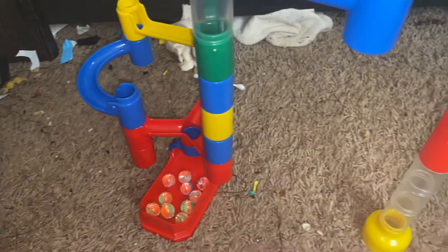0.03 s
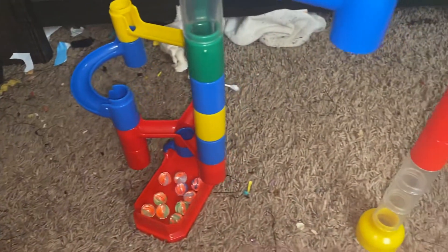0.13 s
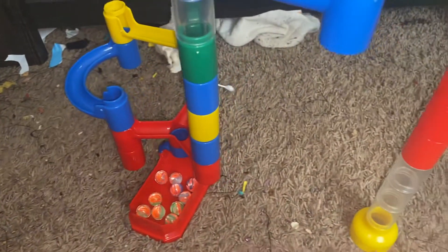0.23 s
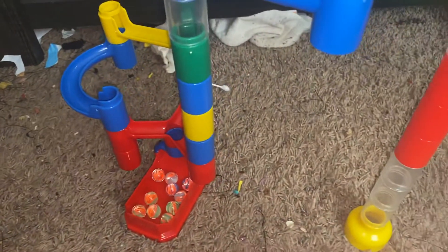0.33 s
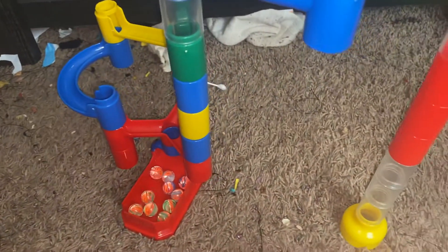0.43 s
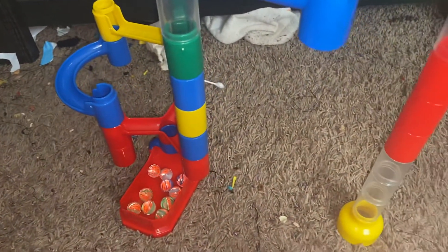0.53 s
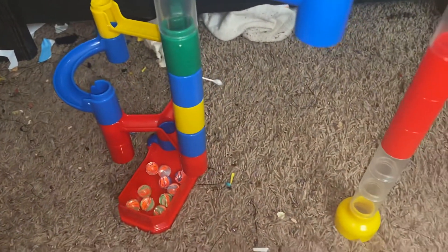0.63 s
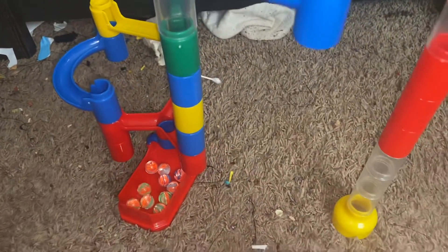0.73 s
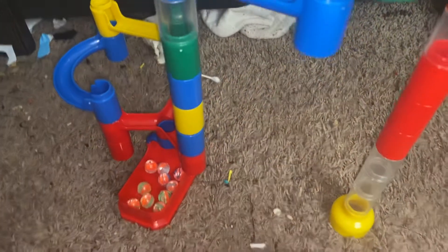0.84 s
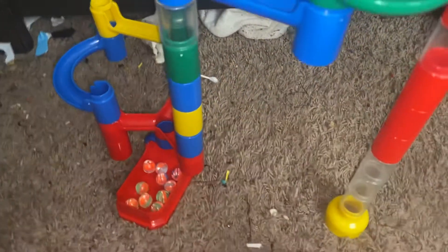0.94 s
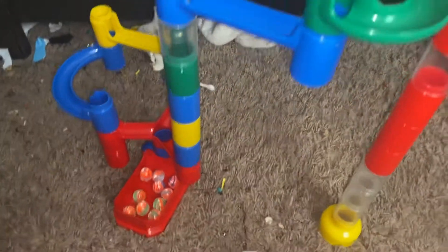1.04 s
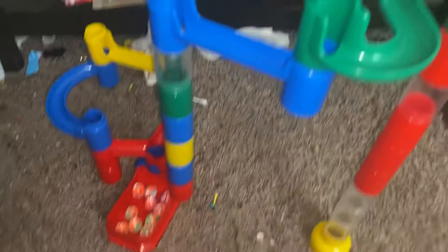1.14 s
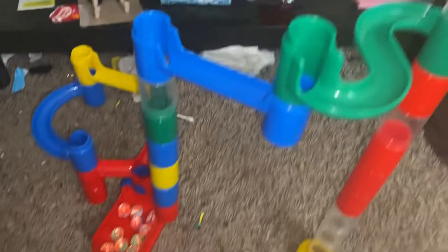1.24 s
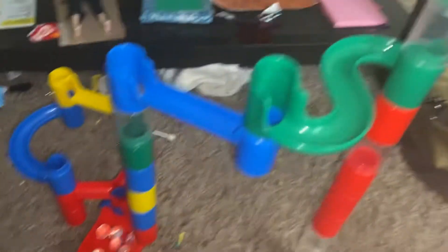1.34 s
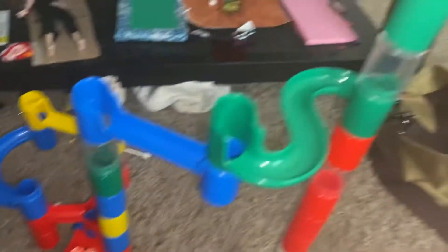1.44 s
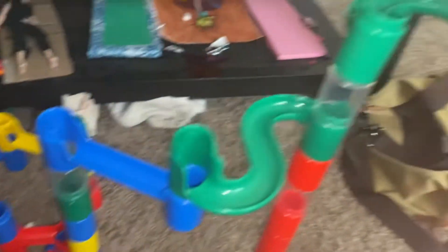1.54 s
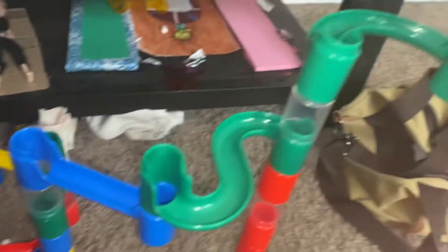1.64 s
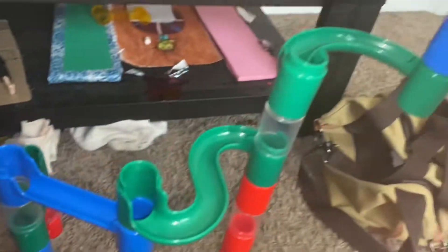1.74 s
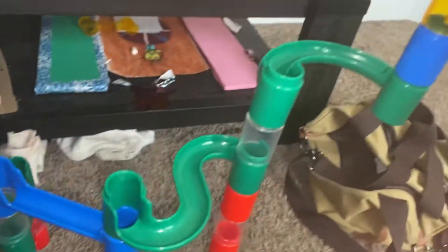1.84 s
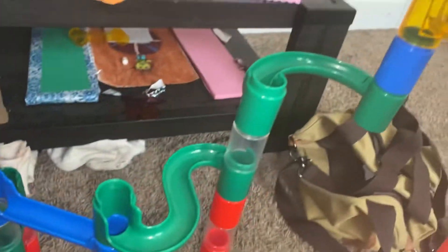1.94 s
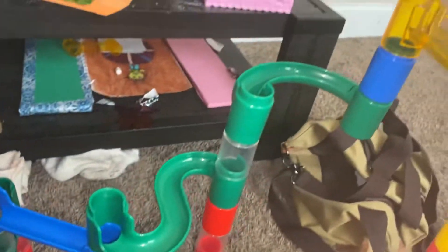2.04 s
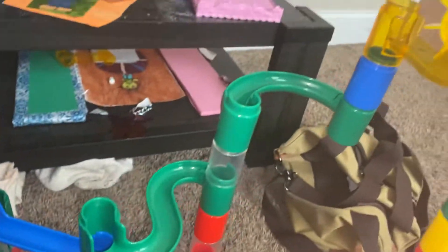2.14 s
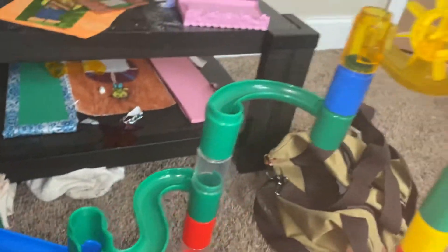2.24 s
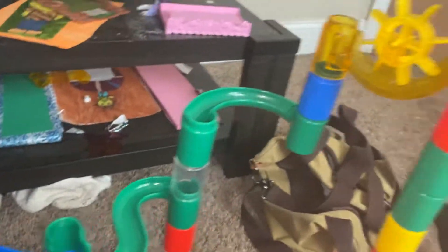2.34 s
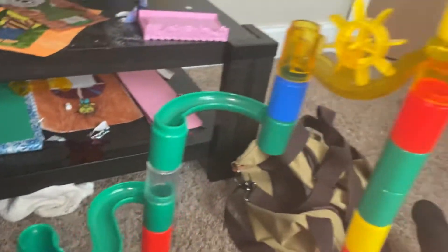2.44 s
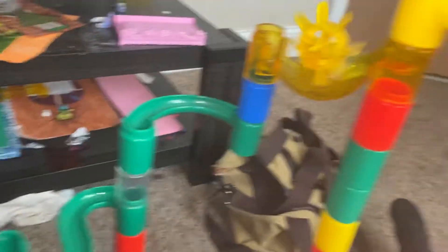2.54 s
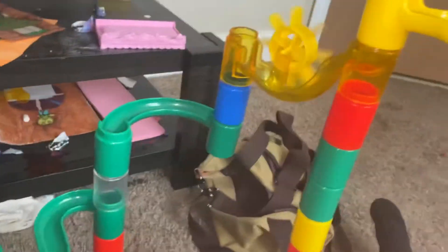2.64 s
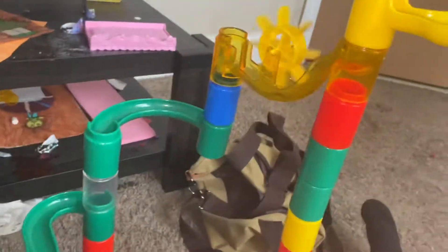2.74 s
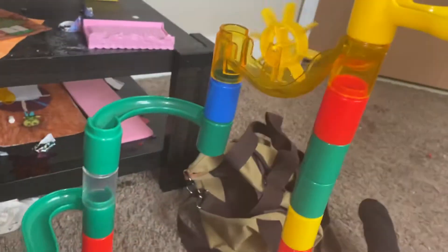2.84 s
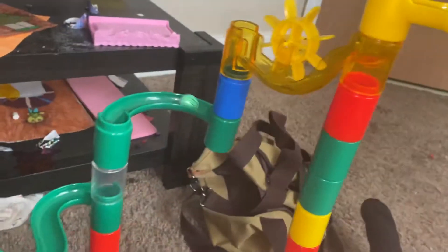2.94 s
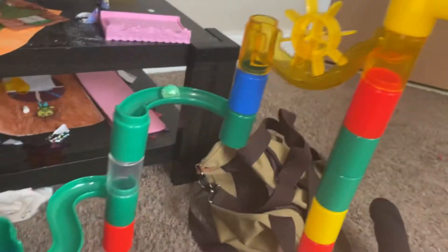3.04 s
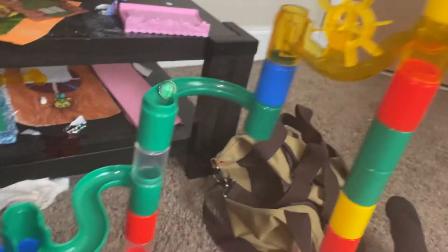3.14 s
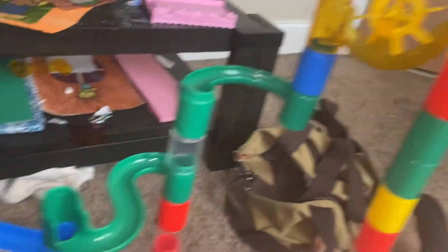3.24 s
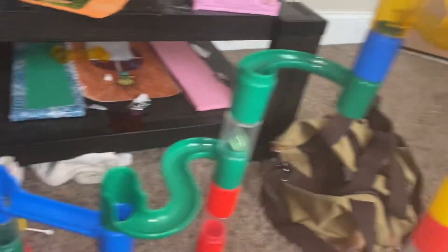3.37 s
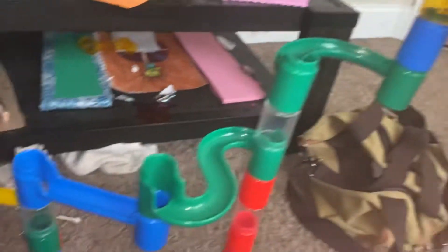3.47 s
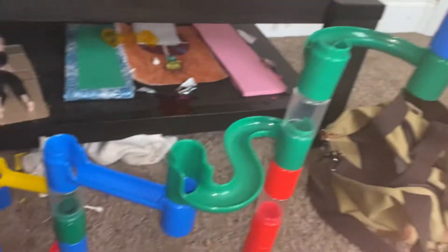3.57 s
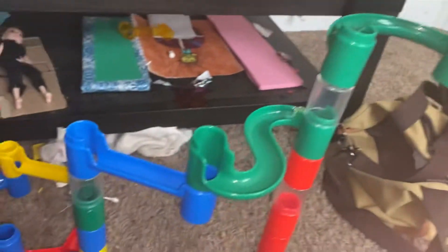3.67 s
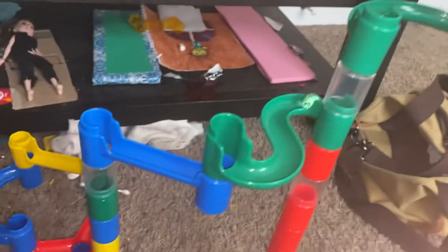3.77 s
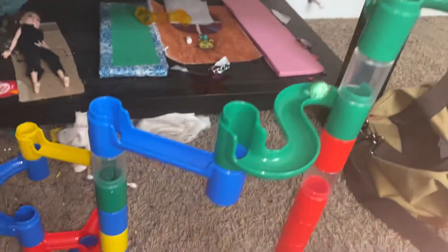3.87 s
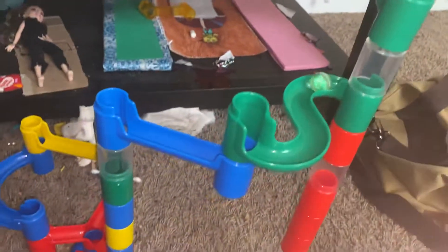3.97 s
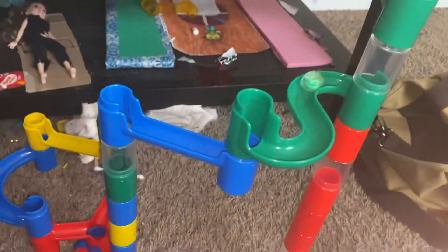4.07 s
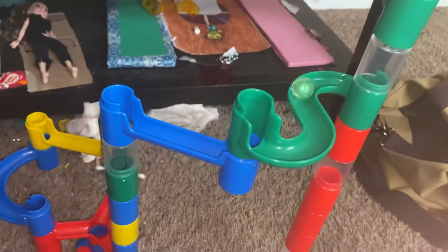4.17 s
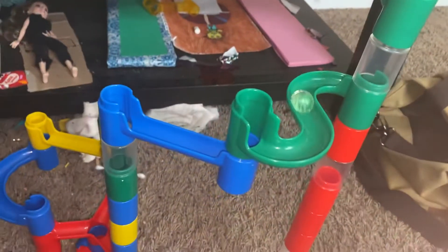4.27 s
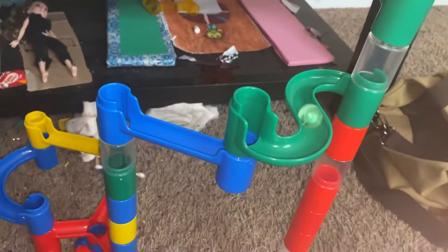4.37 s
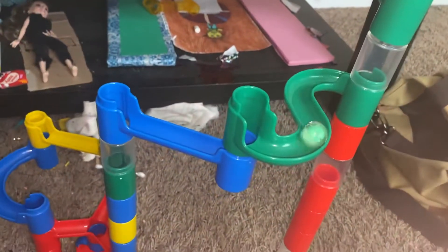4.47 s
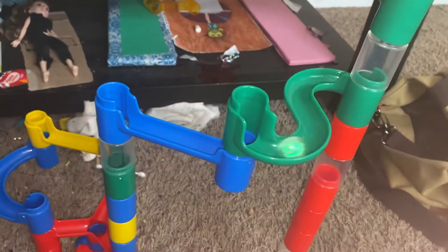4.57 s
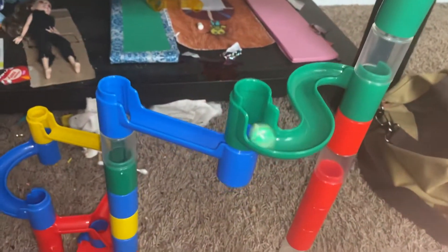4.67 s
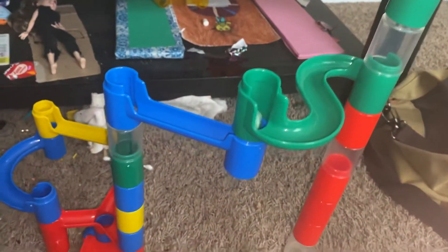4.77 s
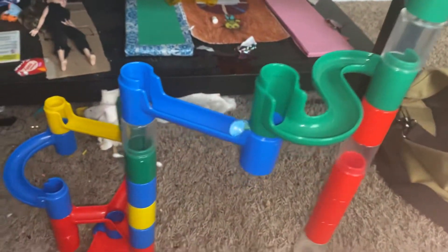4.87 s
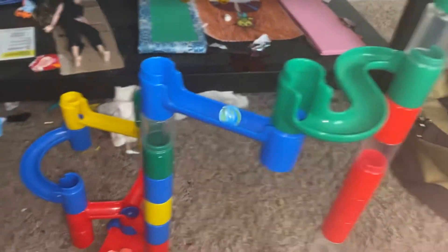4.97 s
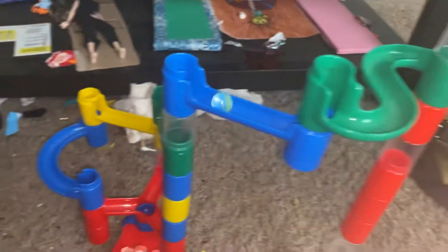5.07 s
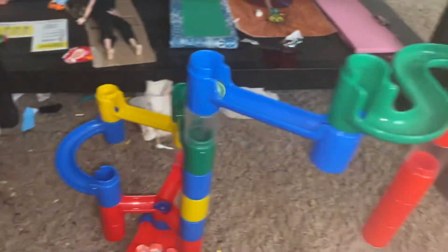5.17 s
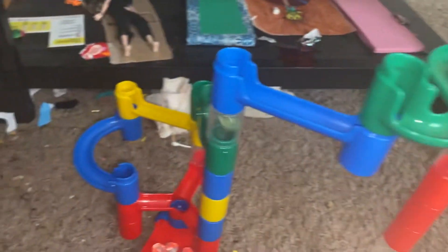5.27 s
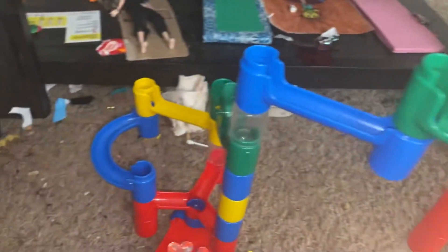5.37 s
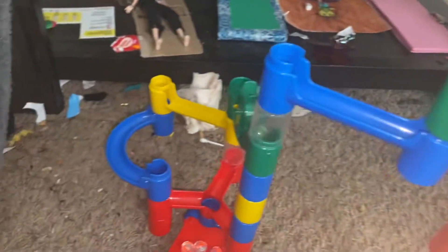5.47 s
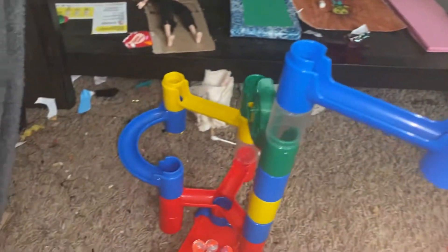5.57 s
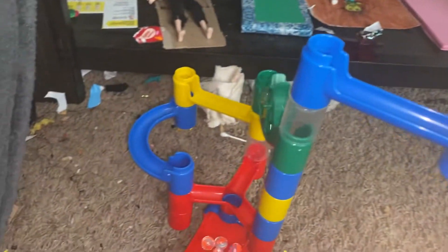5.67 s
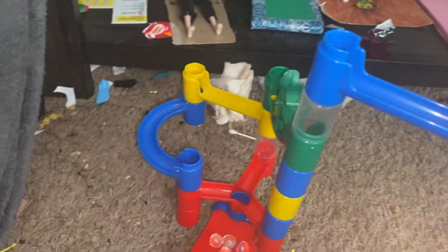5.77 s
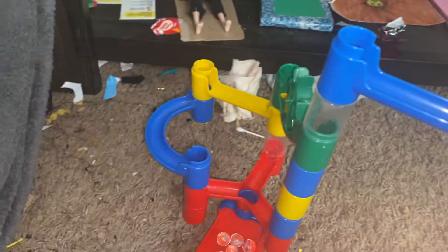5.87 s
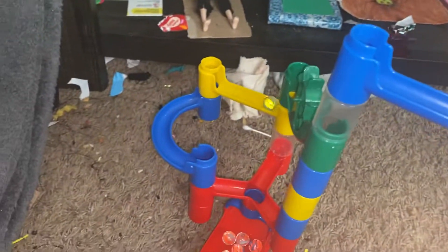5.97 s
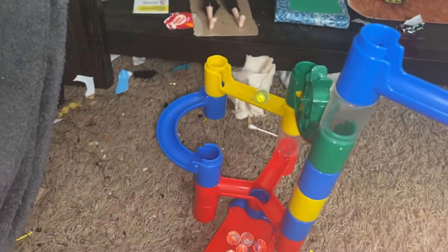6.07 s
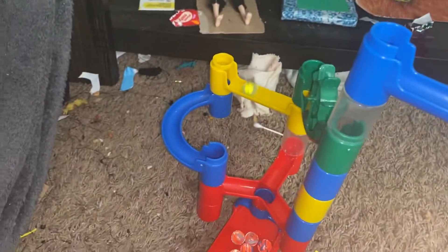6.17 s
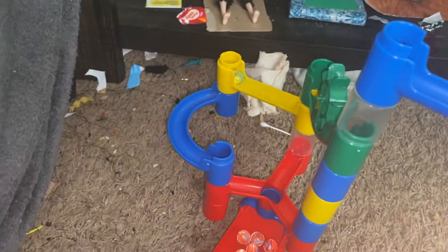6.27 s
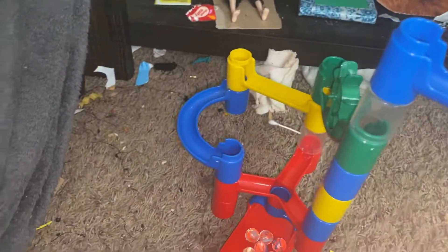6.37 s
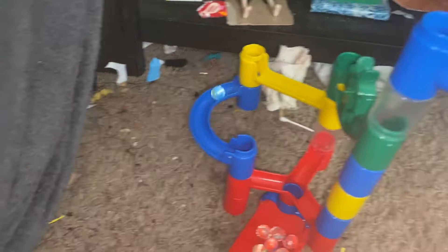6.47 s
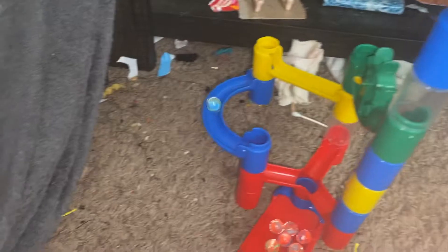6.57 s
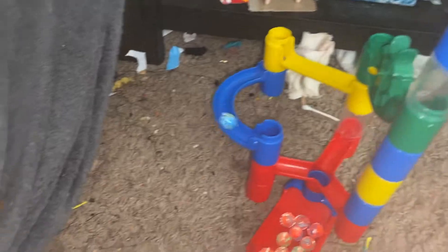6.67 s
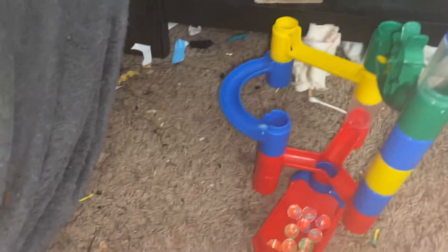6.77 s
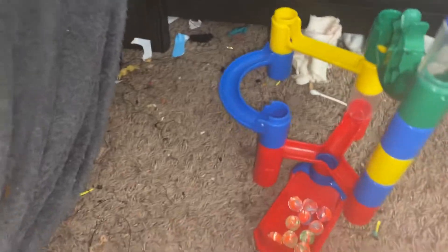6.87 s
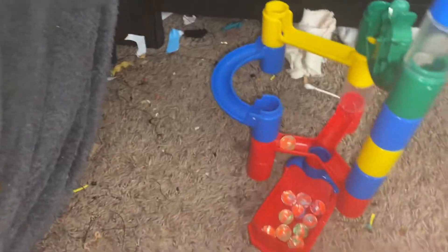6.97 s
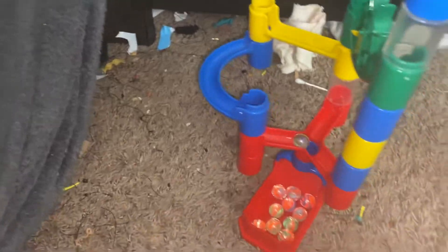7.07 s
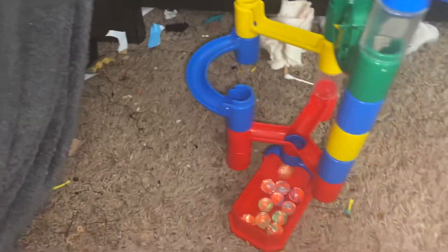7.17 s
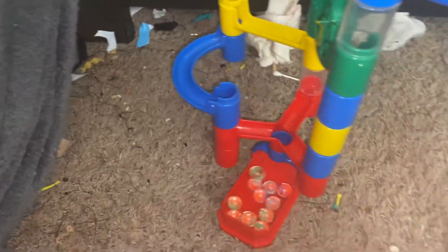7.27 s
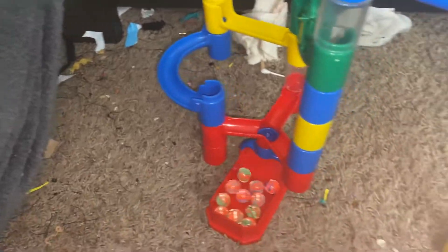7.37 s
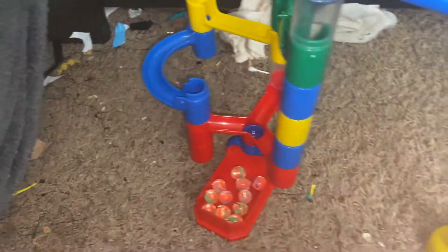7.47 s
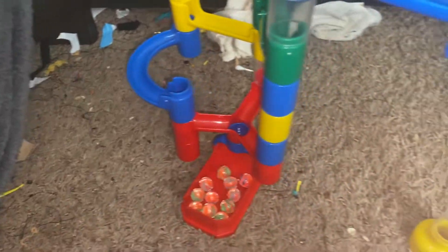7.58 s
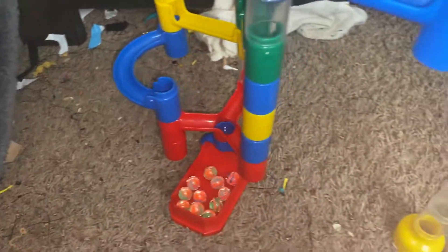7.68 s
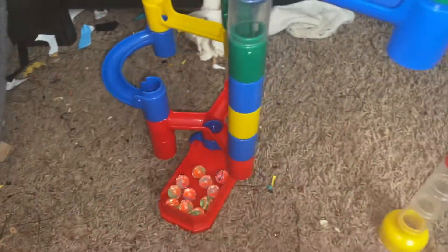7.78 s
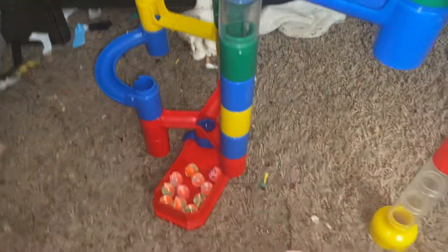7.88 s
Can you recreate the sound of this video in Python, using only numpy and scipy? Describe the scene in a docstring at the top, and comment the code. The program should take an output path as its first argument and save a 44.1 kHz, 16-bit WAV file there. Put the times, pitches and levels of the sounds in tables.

```python
"""Marble run in a carpeted room

A glass marble runs down a plastic toy track: it rolls along chutes, drops through tubes, bounces and rattles
on each piece, and ends in a tray of marbles. Blows and fine bumps ring banks of decaying modes, one bank for
each stretch of track. Filtered clicks add thumps and a hollow drone; a diffuse tail makes the room.
Shaped noise lies underneath as a low rumble and faint hiss."""
import sys
import numpy as np
from scipy import signal
from scipy.fft import rfft, irfft
from scipy.io import wavfile
from scipy.ndimage import uniform_filter1d, minimum_filter1d

SR = 44100
rng = np.random.default_rng(int(sys.argv[2]) if len(sys.argv) > 2 else 0)


def unload_wav(signal):
    """Save mono or channel-first audio to the path in sys.argv[1] as 16-bit WAV at rate SR, clipped to [-1, 1]."""
    wavfile.write(
        sys.argv[1],
        SR,
        np.round(np.clip(np.atleast_2d(signal).T, -1, 1) * 32767).astype(np.int16),
    )


N = 348831
WALL_MODES = 200   # short, dense modes in every piece

# Clear resonances of the pieces of track.
# Each row: pitch in Hz, width in Hz (held within 20 to 500 when rung), level in dB.
FUNNEL = [(2930, 57, 3), (4800, 11, 0), (6200, 40, 2.5), (6520, 280, -10), (8400, 530, -9)]
WHEEL = [(899, 100, 3.5), (2140, 28, -3), (2880, 40, -2), (5025, 100, -14), (5950, 37, -17),
         (6100, 73, -17), (6730, 180, -17)]
ARC = [(1900, 89, -9), (2040, 58, -31), (3346, 150, -4.5), (6700, 230, -11.5)]
CUP = [(1205, 50, 3), (1600, 100, -4), (2700, 110, -6), (3120, 70, -2), (3440, 90, 1), (4520, 170, -8),
       (5730, 70, -11), (6800, 100, -9)]
SNAKE = [(2940, 66, -3.5), (3560, 29, -5), (5700, 160, -7.5), (6700, 690, -5.5)]
RAMP = [(1072, 110, -3.5), (2712, 43, -2.5), (3170, 170, -6.5), (4970, 150, -19.5), (5000, 63, -14),
        (6370, 53, -11.5)]
PADDLES = [(1724, 57, -2), (2010, 140, -7), (2653, 59, 2), (3134, 37, -2.5), (4398, 140, -4.5),
           (4400, 100, -5.5), (6375, 240, -7)]
TRAY = [(656, 44, -6.5), (2057, 100, -1), (2863, 120, -5), (4150, 48, -26), (5960, 150, -38.5),
        (6350, 24, -12), (6780, 84, -5)]
# The route, one stretch per row. Each row: start in seconds, resonances of the piece in use.
ROUTE = [(0, TRAY), (1.7, FUNNEL), (2.02, WHEEL), (2.7, ARC), (3.38, CUP), (4.0, SNAKE), (5.05, RAMP),
         (5.65, PADDLES), (6.78, TRAY)]
# How each stretch responds. Each row: body below 1.5 kHz in dB for a blow of 0 dB or more,
# clear resonances over wall modes in dB when rolled on.
CONTACT = [(-6.5, 4), (-28, 5.5), (-22.5, 3), (-26.5, 4), (-12.5, 8.5), (-18, 6), (-18.5, 6.5), (-15, 8),
           (-16, 4)]


def from_db(db):
    """Decibels to gain."""
    return 10 ** (np.asarray(db) / 20)


def in_time(rows):
    """Curve columns at every sample."""
    s, *columns = np.transpose(rows)
    return [np.interp(np.arange(N) / SR, s, column) for column in columns]


def at_hz(points, hz):
    """A spectrum read on a log-frequency axis."""
    point_hz, point_db = np.transpose(points)
    return np.interp(np.log(hz), np.log(point_hz), point_db)


def band(x, low_hz, high_hz):
    """Band-pass scaled to rms 1."""
    x = signal.sosfilt(signal.butter(2, [low_hz, high_hz], "band", fs=SR, output="sos"), x)
    return x / np.std(x)


def band_db(x, low_hz, high_hz):
    """Energy of a band in dB against the whole sound."""
    power = np.abs(rfft(x)) ** 2
    hz = np.arange(len(power)) * SR / len(x)
    return 10 * np.log10(power[(hz > low_hz) & (hz < high_hz)].sum() / power.sum())


def grains(size, per_s, spread_db):
    """Random clicks of uneven size, rms near 1."""
    clicks = (rng.random(size) < per_s / SR) * rng.standard_normal(size)
    clicks = clicks * from_db(spread_db * np.minimum(rng.exponential(1, size), 4))
    return clicks / np.sqrt(np.mean(clicks ** 2) + 1e-20)


def random_signs(count):
    """Polarity of each mode, up or down at random."""
    return rng.choice([-1, 1], count)


def is_clear(hz):
    """Mark the clear resonances, which stand ahead of the wall modes."""
    return np.arange(len(hz)) < len(hz) - WALL_MODES


def stretch_at(s):
    """Number of the stretch of the route in use at a time in seconds."""
    return np.searchsorted([start for start, piece in ROUTE], s, "right") - 1


def background():
    """Steady low rumble of the house and microphone hiss: noise shaped by one spectrum."""
    # Rumble and hiss spectrum. Each row: frequency in Hz, level in dB per Hz.
    rumble = [(15, -68), (25, -26), (55, -15.5), (70, -3), (95, -10), (120, -11), (214, -19), (259, -21),
              (349, -20.5), (389, -23.5), (553, -29), (746, -33), (7300, -44), (11000, -45), (16500, -61)]
    level_db = -59   # rms
    hz = np.maximum(np.arange(N // 2 + 1) * SR / N, 1)
    noise = irfft(rfft(rng.standard_normal(N)) * from_db(at_hz(rumble, hz)), N)
    return from_db(level_db) * noise / np.std(noise)


def room(x):
    """A diffuse tail whose treble dies sooner on carpet."""
    t60_s, treble_ratio, build_up_s = 0.21, 0.26, 0.029
    t = np.arange(SR // 2) / SR
    noise = rng.standard_normal(len(t))
    low = signal.sosfilt(signal.butter(1, 4000, fs=SR, output="sos"), noise)
    treble = noise - low
    tail = low * from_db(-60 * t / t60_s) + treble * from_db(-60 * t / (treble_ratio * t60_s))
    tail *= np.clip(t / build_up_s, 0, 1)
    return signal.fftconvolve(x, tail / np.sqrt(np.sum(tail ** 2)))[:N]


def modes_of(piece):
    """Pitches and decaying sines of a piece: its clear resonances plus many short wall modes."""
    # Dense wall modes of the plastic. Each row: frequency in Hz, relative level in dB per Hz.
    walls = [(180, -70.5), (300, -40.5), (638, -13.5), (1600, -7), (2740, -6), (8440, -7.5), (13700, -17.5),
             (16500, -28.5)]
    wall_t60_s, wall_db = 0.024, 14   # decay at 3 kHz, lift over the table
    t = np.arange(3072) / SR
    hz, width, level_db = np.transpose(piece)
    width = np.clip(width, 20, 500)

    wall_hz = np.linspace(300 ** .5, 16500 ** .5, WALL_MODES) ** 2 * rng.uniform(.99, 1.01, WALL_MODES)
    wall_width = np.log(1000) / np.pi / wall_t60_s * (wall_hz / 3000) ** 0.83
    # sparser high modes each stand for a wider band; wide modes need more height for the same peak
    wall_gain = from_db(wall_db + at_hz(walls, wall_hz)) * np.sqrt((wall_hz / 3000) ** .5 * wall_width)

    hz, gain = np.r_[hz, wall_hz], np.r_[from_db(level_db) * width, wall_gain]
    width = np.r_[width, wall_width]
    decay = np.exp(-np.pi * width[:, None] * t)
    return hz, gain[:, None] * decay * np.sin(2 * np.pi * hz[:, None] * t)


def rubbing(bodies, bumps, start_s, end_s):
    """Fine bumps ring whichever piece the marble is on, in overlapping steps with fresh mode strengths."""
    step = 1024
    fade = np.hanning(2 * step) ** .5
    rung = np.zeros(N + 8192)
    for a in range(round(start_s * SR), round(end_s * SR), step):
        stretch = stretch_at((a + step) / SR)
        hz, rings = bodies[stretch]
        # steady rubbing builds up the narrow resonances
        clear = from_db(CONTACT[stretch][-1] * is_clear(hz))
        # as the contact point travels, other modes come forward
        strength = clear * from_db(rng.normal(0, 2, len(hz))) * random_signs(len(hz))
        body = strength @ rings
        sound = signal.fftconvolve(fade * bumps[a:a + 2 * step], body / np.sqrt(np.sum(body ** 2)))
        rung[a:a + len(sound)] += sound
    return rung[:N]


def moving_colour(x, centre_hz):
    """Half-octave bands weighted around a centre that moves in time, falling off on both sides."""
    below_db_per_octave, above_db_per_octave = 6, 8.5
    quarter_octave = 2 ** .25
    out = 0
    for k, hz in enumerate(500 * 2 ** np.arange(0, 5, .5)):
        octaves = np.log2(hz / centre_hz)
        slope_db = np.where(octaves > 0, -above_db_per_octave * octaves, below_db_per_octave * octaves)
        # alternating signs keep neighbouring bands from cancelling where they meet
        sign = (-1) ** k
        out = out + sign * from_db(slope_db) * band(x, hz / quarter_octave, hz * quarter_octave)
    return out


def tower_drone(bumps):
    """Hollow drone of the tower: the rolling bumps through one low band."""
    # Drone level. Each row: time in seconds, level in dB.
    drone_curve = [(1.78, -74.5), (2.8, -64), (3.6, -68.5), (3.8, -76), (4.3, -70), (5.15, -65.5),
                   (5.3, -57), (5.6, -62), (5.75, -46.5), (6.25, -54.5), (6.7, -59.5), (7.1, -62),
                   (7.62, -94)]
    centre_hz, width_hz = 278, 79
    level_db, = in_time(drone_curve)
    return from_db(level_db) * band(bumps, centre_hz - width_hz / 2, centre_hz + width_hz / 2)


def rolling(bodies):
    """Fine bumps of the chute excite the track and tower; speed and curve shift the colour."""
    # The marble rolling. Each row: time in seconds, rumble level in dB (before halving), centre of colour in Hz.
    roll = [(1.78, -40.5, 5240), (2.0, -67.5, 3620), (2.3, -61.5, 1900), (2.8, -48.5, 2300),
            (3.1, -49, 1760), (3.3, -48.5, 2160), (3.6, -49.5, 1900), (3.72, -82, 1600), (4.0, -71.5, 2220),
            (4.3, -54, 1150), (4.74, -49.5, 1950), (4.95, -47.5, 2160), (5.08, -52, 1730),
            (5.15, -53.5, 2050), (5.45, -53.5, 2050), (5.6, -37.5, 1940), (5.7, -56.5, 2380),
            (6.05, -45.5, 2000), (6.29, -110, 1970), (6.47, -45, 1870), (6.75, -42.5, 2130),
            (7.09, -59.5, 2000), (7.5, -79, 2016), (7.62, -72, 2000)]
    start_s, end_s = roll[0][0], roll[-1][0]
    rumble_db, centre_hz = in_time(roll)
    knots = np.arange(0, N, 600)
    uneven_db = np.interp(np.arange(N), knots, rng.normal(0, 2.5, len(knots)))
    bumps = from_db(uneven_db) * grains(N, per_s=4000, spread_db=2.5)
    rumble = moving_colour(rubbing(bodies, bumps, start_s, end_s), centre_hz)
    t = np.arange(N) / SR
    moving = (t > start_s) & (t < end_s)
    return moving * (from_db(rumble_db) * rumble * .5 + tower_drone(bumps))


def blows():
    """Single hits, bounces and ridge ticks as rows of the same columns, plus the stretch of the route."""
    # Marble strikes plastic. Each row: time in seconds, peak in dB, sharpness above 6 kHz in dB,
    # pitch of the struck spot in Hz, rattle t60 in seconds.
    hits = [(0.11, -43, -16, 2080, 0.11), (0.419, -36.5, -34, 2050, 0.082), (0.85, -47, -39, 1730, 0.11),
            (1.1, -43, 13, 2380, 0.12), (1.125, -57, 8, 1680, 0.12), (1.209, -52, 6, 2870, 0.11),
            (1.53, -31.5, -3, 2980, 0.09), (1.738, -0.5, 2.5, 2960, 0.12), (1.769, -10, -4.5, 3300, 0.091),
            (1.785, -17.5, -3, 2980, 0.1), (1.903, -37.5, -8, 2760, 0.1), (2.042, -31, -27, 1760, 0.19),
            (2.21, -31, -20.5, 2970, 0.12), (2.228, -23.5, -14, 2900, 0.14),
            (2.256, -25, -29.5, 2960, 0.13), (2.317, -28.5, -48, 2100, 0.1),
            (2.375, -9.5, -13.5, 3000, 0.19), (2.381, -11.5, -11, 2970, 0.15),
            (2.405, 0.5, -14, 5160, 0.14), (2.42, -22, -5, 3040, 0.12), (2.449, -19.5, -9, 2650, 0.23),
            (2.52, -10, 7, 3170, 0.17), (2.529, -13.5, -11, 3095, 0.18), (2.55, -7.5, -6.5, 3020, 0.19),
            (2.571, -15.5, -15.5, 2970, 0.12), (2.621, -15, 6, 3450, 0.15), (2.639, -13, -12, 2900, 0.14),
            (2.728, -3.5, -10.5, 3200, 0.14), (2.759, -5.5, -6, 3000, 0.09), (2.801, -8.5, -12, 4000, 0.17),
            (2.817, -2, -16.5, 1720, 0.14), (2.869, -17, -13, 2740, 0.16), (2.897, -16, -14, 3130, 0.17),
            (3.049, -31.5, -36, 3500, 0.13), (3.217, -38, -23, 2190, 0.11), (3.245, -30.5, -9, 2210, 0.1),
            (3.282, 0, -7, 3850, 0.082), (3.304, -19.5, -7, 4860, 0.1), (3.312, -8.5, -9.5, 3380, 0.098),
            (3.32, -16.5, -11, 3120, 0.12), (3.344, -9.5, -6, 2200, 0.065),
            (3.367, -6.5, -14.5, 3530, 0.054), (3.392, 1.5, -2.5, 3630, 0.11),
            (3.41, -4.5, -3.5, 3440, 0.097), (4.104, -27.5, -8, 3090, 0.096),
            (4.135, -36.5, -5, 2680, 0.12), (4.435, -22.5, -5, 2680, 0.19), (4.447, -26, -25, 3150, 0.15),
            (4.733, -51, 6, 1910, 0.12), (4.765, -6.5, -6, 2200, 0.12), (4.773, -6, -15, 2260, 0.14),
            (4.798, -2, -12.5, 3030, 0.26), (4.826, -9, -23, 2700, 0.11), (4.845, -0.5, -7.5, 3070, 0.098),
            (4.959, -30.5, -27, 3180, 0.15), (5.107, -36.5, -15, 2000, 0.14),
            (5.165, -30.5, -25, 2130, 0.07), (5.206, -5.5, -16.5, 2940, 0.12),
            (5.214, -4.5, -13.5, 2780, 0.1), (5.228, -4.5, -12.5, 2800, 0.091),
            (5.272, -13, -4.5, 2800, 0.1), (5.287, 1.5, -12, 3500, 0.12), (5.295, -1, -11.5, 3340, 0.074),
            (5.3, -1, -18, 4920, 0.12), (5.316, -1, -9, 3320, 0.12), (5.325, 1, -8.5, 3250, 0.076),
            (5.366, -11.5, -16, 3540, 0.11), (5.4, -23.5, -16, 3230, 0.1), (5.482, -8.5, -0.5, 2740, 0.18),
            (5.51, -7, -11, 2550, 0.18), (5.68, 4, -10.5, 2710, 0.13), (5.722, -14, -22, 2610, 0.1),
            (5.739, 0.5, -4, 2690, 0.14), (5.75, -1.5, -9.5, 2470, 0.12), (5.761, -6, -25, 2100, 0.12),
            (5.776, -6, -14.5, 2740, 0.095), (6.314, -2.5, -12.5, 2700, 0.064),
            (6.342, 2, -13.5, 3800, 0.13), (6.382, -3, -10, 3130, 0.07), (6.41, -14.5, -31, 2620, 0.13),
            (6.53, -20.5, -15.5, 2700, 0.075), (6.615, -25, -16, 2660, 0.18),
            (6.679, -30.5, -35, 1720, 0.1), (6.764, -24, -15.5, 2620, 0.055), (6.803, 8, -11, 2540, 0.075),
            (6.826, -12, -19, 2770, 0.13), (6.852, 8, -9.5, 3160, 0.093), (6.874, 4.5, -11.5, 2570, 0.1),
            (6.916, 4, -5.5, 2550, 0.092), (7.045, -31.5, -23, 1680, 0.12), (7.103, -2.5, -11, 2730, 0.13),
            (7.115, -3.5, -8, 2810, 0.076), (7.173, 7, -13, 1950, 0.098), (7.233, -5, -11.5, 2020, 0.085),
            (7.259, -9, -8.5, 2860, 0.11), (7.329, -18, -8, 2990, 0.1), (7.36, 4, -9.5, 2020, 0.1),
            (7.39, -12.5, -19, 2015, 0.093), (7.4, -1, -11.5, 2770, 0.12), (7.419, -12, -21, 2170, 0.13),
            (7.466, -20.5, -17, 1960, 0.12), (7.485, -26, -7.5, 2900, 0.13), (7.677, -26, -18, 2090, 0.076),
            (7.771, -28.5, -36, 2960, 0.063)]
    # The marble bounces to rest, each hop shorter and softer. Each row: first blow in seconds, its peak in dB,
    # sharpness in dB, spot in Hz, rattle t60 in seconds, loss in dB per hop.
    bounces = [(3.469, -10.5, -8, 3450, 0.065, 2.5), (5.82, -8.5, -12, 2620, 0.16, 4)]
    # Timing of those bounces. Each row: first hop in seconds, length ratio of each hop to the last, blow count.
    hops = [(.042, .72, 7), (.0345, .73, 5)]
    rows = list(hits)
    for (s, peak_db, *colour, loss_db), (hop_s, ratio, count) in zip(bounces, hops):
        for k in range(count):
            elapsed_s = hop_s * (1 - ratio ** k) / (1 - ratio)
            rows.append((s + elapsed_s, peak_db - loss_db * k, *colour))

    # the marble speeds up over evenly spaced ridges
    first_s, ridges_per_s, gain_per_s2, ridge_count = 5.967, 16.4, 40.5, 7
    first_db, rise_db, sharp_db, rattle_t60_s = -18.5, 0.77, -14.5, 0.093
    first_spot_hz, spot_hz_per_tick = 2020, 150
    for k in range(ridge_count):
        speed = np.sqrt(ridges_per_s ** 2 + 2 * gain_per_s2 * k)
        s = first_s + (speed - ridges_per_s) / gain_per_s2
        rows.append((s, first_db + rise_db * k, sharp_db, first_spot_hz + spot_hz_per_tick * k, rattle_t60_s))
    return [(*row, stretch_at(row[0])) for row in rows]


def thumps():
    """Blows shake the whole tower on the carpet, heard as low band-passed clicks."""
    lift_db = 6.5
    clicks = np.zeros(N)
    for s, peak_db, *colour, stretch in blows():
        clicks[round(s * SR)] = from_db(peak_db + .5 * CONTACT[stretch][0] + lift_db)
    return signal.sosfilt(signal.butter(2, [70, 330], "band", fs=SR, output="sos"), clicks + 1e-18)


def struck_body(body, peak_db, sharp_db, spot_hz, stretch):
    """Ring of one blow: fresh mode strengths, favoured around the struck spot and tilted in tone."""
    # Clear resonances over wall modes when struck, in dB, one value per stretch.
    clear_lift_db = [0, 7, 6, 2, 12, 0, 5, 3, 2]
    spot_db, spot_octaves = 7, 0.28
    clear_spread_db, wall_spread_db = 3, 2.5   # change of mode strengths from blow to blow
    body_db_per_db = -0.2   # a light touch is longer and feeds the low modes more
    hz, rings = body
    clear = is_clear(hz)
    favoured_db = spot_db * np.exp(-(np.log2(hz / spot_hz) / spot_octaves) ** 2)
    favoured_db = favoured_db + clear_lift_db[stretch] * clear
    spread_db = np.where(clear, clear_spread_db, wall_spread_db) * rng.standard_normal(len(hz))
    strength = from_db(favoured_db + spread_db) * random_signs(len(hz))
    plain = strength @ rings

    # lean the low and high modes towards the body and sharpness of this blow
    body_db = CONTACT[stretch][0] + body_db_per_db * min(peak_db, 0)
    low_lift_db = body_db - band_db(plain, 500, 1500)
    high_lift_db = sharp_db - band_db(plain, 6000, 15000)
    tilt = [(900, low_lift_db), (1800, 0), (4500, 0), (9000, high_lift_db)]
    return (strength * from_db(at_hz(tilt, hz))) @ rings


def glass_crack(sharp_db):
    """Glass meeting plastic: a very short bright noise burst, relative to the peak of the ring."""
    level_db, t60_s = -11.5, 0.00081
    t = np.arange(200) / SR
    return np.diff(rng.standard_normal(201)) * from_db(level_db + sharp_db - 60 * t / t60_s)


def strikes(bodies):
    """Each blow rings the piece with fresh mode strengths, then the marble chatters against the walls."""
    joints_db, joints_t60_s, rattle_db = -18.5, 0.017, -29
    out, size = np.zeros(N + 16384), 8192
    t = np.arange(size) / SR
    for s, peak_db, sharp_db, spot_hz, rattle_t60_s, stretch in blows():
        ring = struck_body(bodies[stretch], peak_db, sharp_db, spot_hz, stretch)
        # loose joints pass the blow on for a few milliseconds, the chatter lasts longer
        shake = from_db(joints_db - 60 * t / joints_t60_s) + from_db(rattle_db - 60 * t / rattle_t60_s)
        push = shake * grains(size, per_s=2500, spread_db=1.5)
        push[0] = 1   # the blow itself
        sound = signal.fftconvolve(push, ring)
        sound[:200] += glass_crack(sharp_db) * np.abs(sound).max()
        at = round(s * SR)
        out[at:at + len(sound)] += sound * from_db(peak_db) / np.abs(sound).max()
    return out[:N]


def scene():
    """Marble, room and background."""
    room_db = -20.5
    bodies = [modes_of(piece) for s, piece in ROUTE]
    # small light pieces radiate little bass
    struck = signal.sosfilt(signal.butter(3, 560, "high", fs=SR, output="sos"), strikes(bodies))
    marble = struck + rolling(bodies) + thumps()
    return (marble + from_db(room_db) * room(marble) + background())[None]


def record(dry):
    """The microphone drops deep bass, a fast limiter holds the loudest blows, the top is cut."""
    limit_db, release_db_per_s, cutoff_hz = -1.7, 900, 17000
    x = signal.sosfilt(signal.butter(2, 35, "high", fs=SR, output="sos"), dry)
    fall_db = release_db_per_s * np.arange(N) / SR
    # peaks hold the level, which then falls at the release rate
    held_db = np.maximum.accumulate(20 * np.log10(np.abs(x) + 1e-9) + fall_db, axis=1) - fall_db
    cut_db = np.minimum(limit_db - held_db, 0)
    # spread and smooth the cut over about 1 ms around each peak
    cut_db = uniform_filter1d(minimum_filter1d(cut_db, size=45), size=45)
    return signal.sosfilt(signal.cheby2(12, 70, cutoff_hz, fs=SR, output="sos"), x * from_db(cut_db))


dry = scene()
out = record(dry)
unload_wav(out)
```